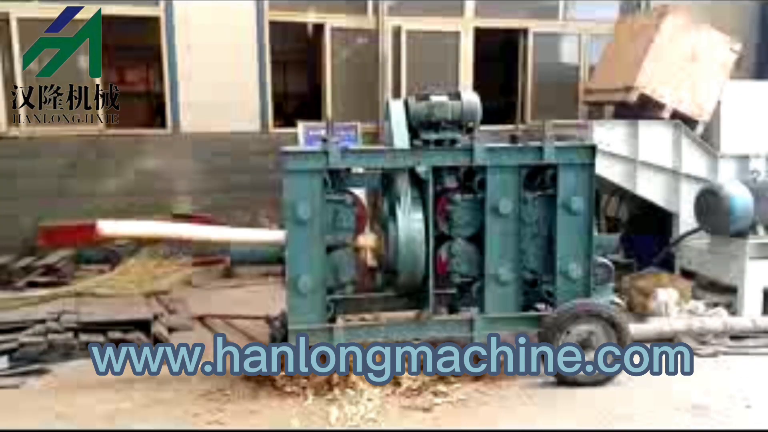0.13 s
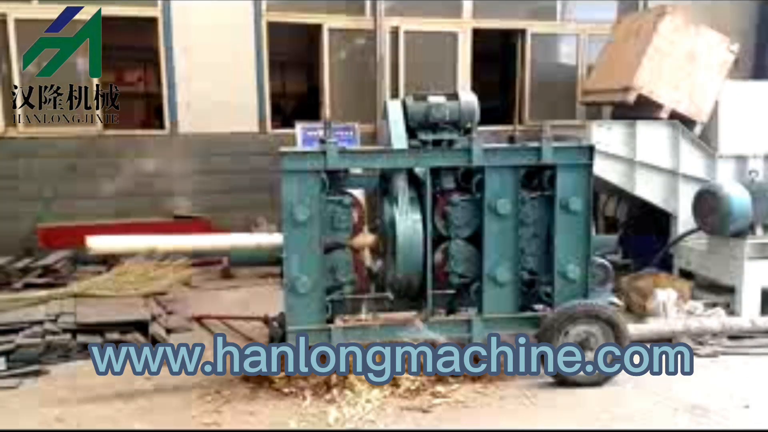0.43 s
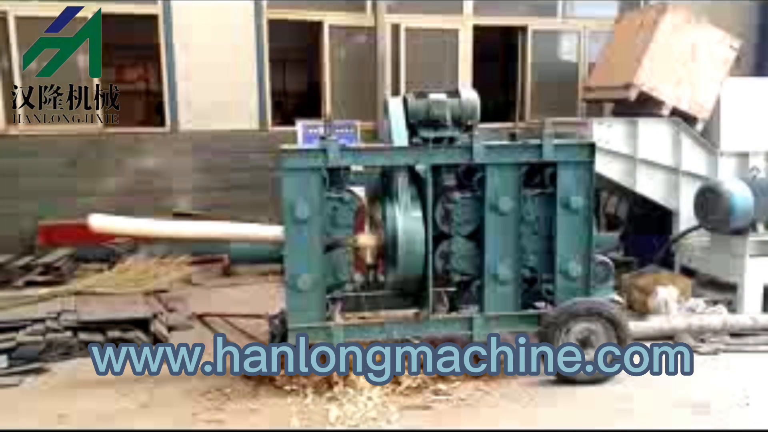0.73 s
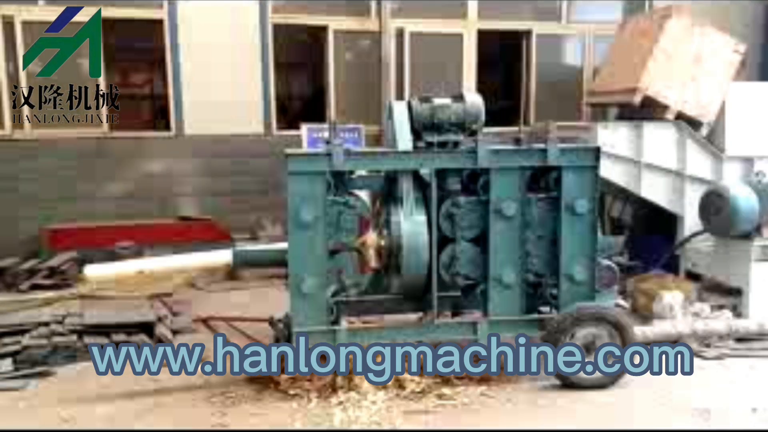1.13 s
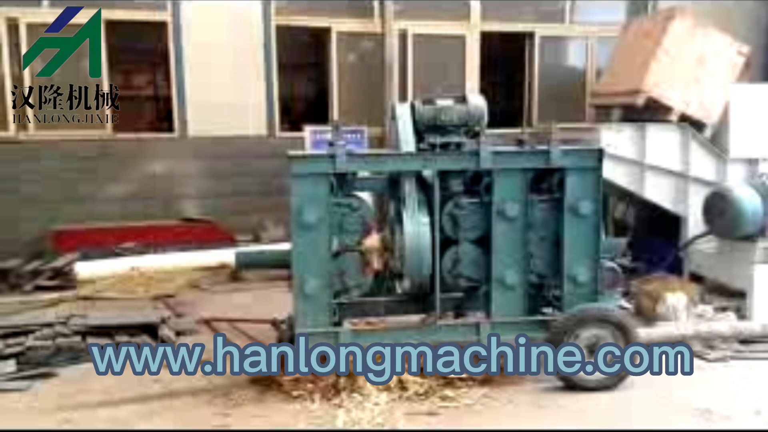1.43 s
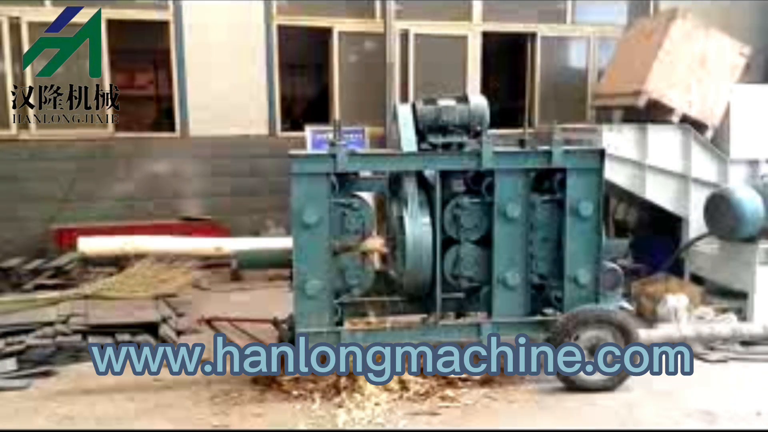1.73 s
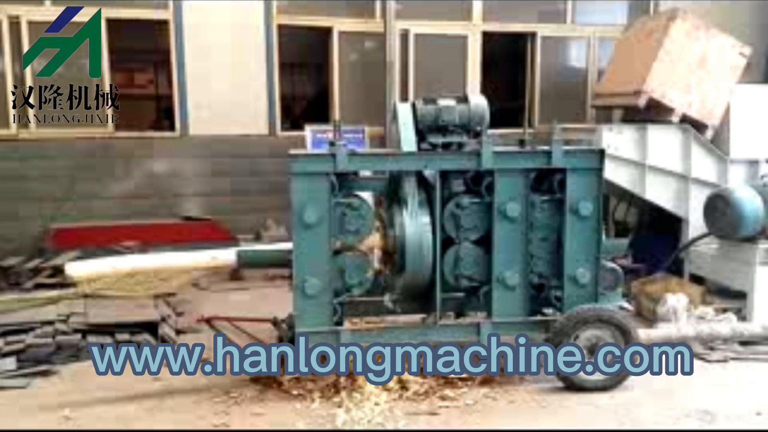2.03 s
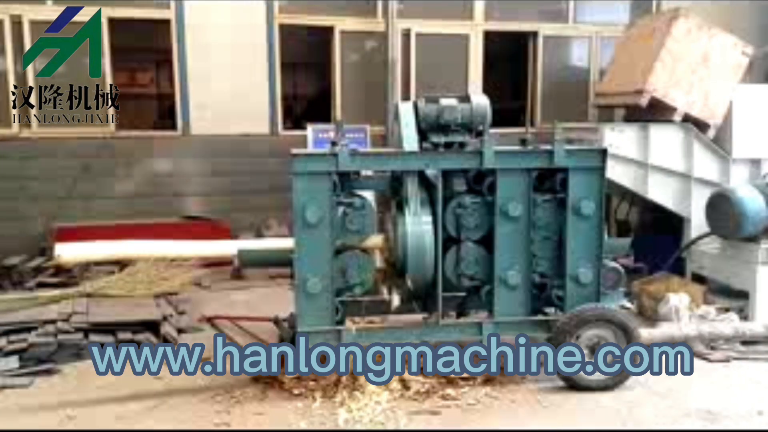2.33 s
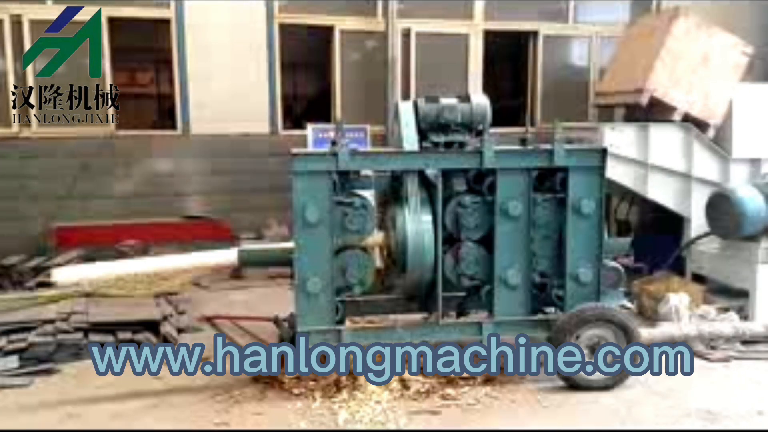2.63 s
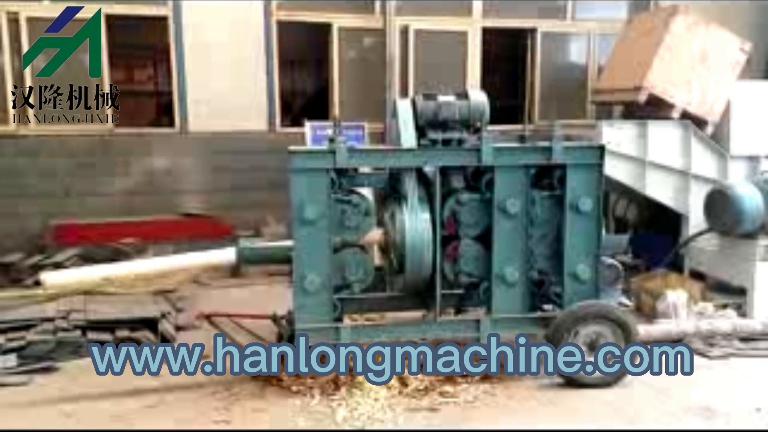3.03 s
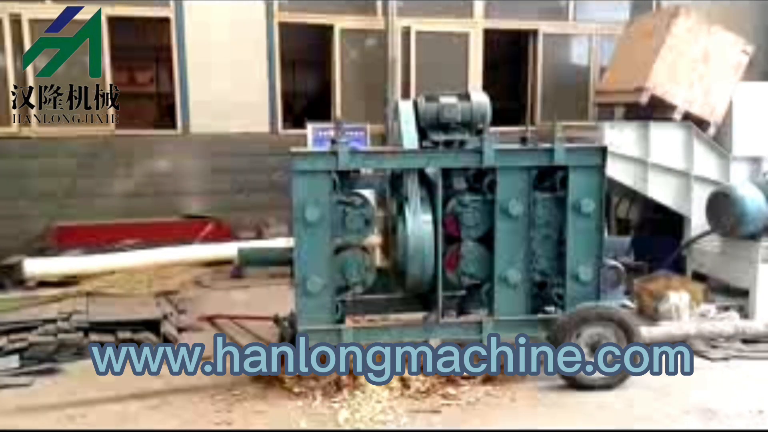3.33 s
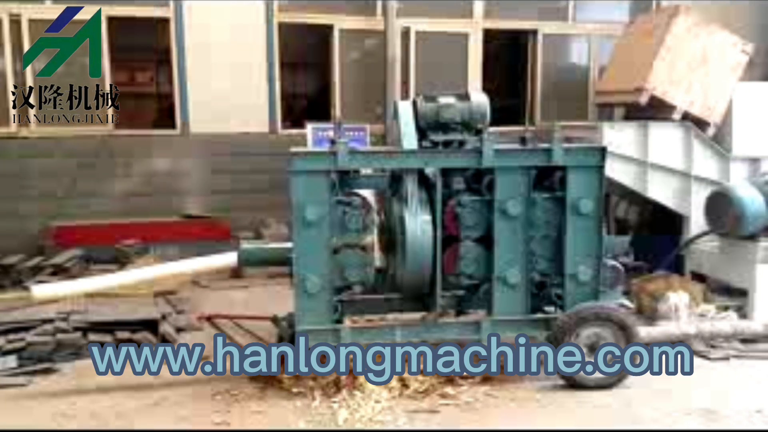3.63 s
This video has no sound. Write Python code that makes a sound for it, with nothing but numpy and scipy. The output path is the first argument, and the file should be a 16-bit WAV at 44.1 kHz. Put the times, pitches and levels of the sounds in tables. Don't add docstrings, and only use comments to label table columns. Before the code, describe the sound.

Loud grinding debarker with whining gears, clattering log knocks and a hard slam near the end.

```python
import sys
import numpy as np
from scipy import signal
from scipy.fft import rfft, irfft, next_fast_len
from scipy.io import wavfile
from scipy.ndimage import uniform_filter1d, map_coordinates

SR = 44100
rng = np.random.default_rng(int(sys.argv[2]) if len(sys.argv) > 2 else 0)


def wav_record(signal):
    frames = np.transpose(np.atleast_2d(signal))
    bounded = np.clip(frames, -1, 1)
    quanta = np.round(bounded * 32767).astype(np.int16)
    wavfile.write(sys.argv[1], SR, quanta)


def undo_db(level):
    steps = np.asarray(level, float) / 20
    return 10 ** steps


N = 167139


def unit(x):
    return x / np.sqrt(np.mean(x ** 2) + 1e-20)


def along(points, hz):
    f, v = np.transpose(points)
    return np.interp(np.log(hz + 1), np.log(f + 1), v)


def curve(rows):
    return np.interp(np.arange(N) / SR, *np.transpose(rows))


def wobble(rate):
    knots = rng.standard_normal(int(N * rate / SR) + 4)
    return map_coordinates(knots, [np.arange(N) * rate / SR])


def filtered(x, response):
    n = x.shape[-1]
    m = next_fast_len(n + 8192)
    return irfft(rfft(x, m) * response(np.fft.rfftfreq(m, 1 / SR)), m)[..., :n]


def peak(f, hz, wide):
    return 1j * f * wide / (hz * hz - f * f + 1j * f * wide + 1e-9)


def spread(pair, spectrum):
    # (frequency [Hz], width [Hz], lift [dB])
    panels = [(117, 13, 3.5), (200, 33, 4.5), (314, 23, -7.5), (548, 70, 3), (769, 26, 5), (888, 6.4, 6.5),
              (1160, 80, 1.5), (1480, 160, 0.5), (2167, 26, 7), (3650, 90, 2.5)]
    # (frequency [Hz], correlation [-1..1])
    likeness = [(30, 0.21), (70, 1), (130, 0.93), (260, 0.91), (550, 0.27), (1140, 0.63), (2380, 0.092),
                (4970, 0.06), (10400, 0.11)]

    def mid_and_side(f):
        lift_db = sum(db * abs(peak(f, hz, wide)) ** 2 for hz, wide, db in panels)
        angle = np.arccos(np.clip(along(likeness, f), -1, 1)) / 2
        return undo_db(along(spectrum, f) + lift_db) * [np.cos(angle), np.sin(angle)]

    mid, side = filtered(pair, mid_and_side)
    return unit(np.array([mid + side, mid - side]))


def patchy(pair, patchy_db):
    z = signal.stft(pair, nperseg=512)[2]
    field = uniform_filter1d(rng.standard_normal(z.shape[1:]), size=7, axis=0)
    field = uniform_filter1d(field, size=9, axis=1)
    return signal.istft(z * undo_db(patchy_db * unit(field)), nperseg=512)[1][:, :N]


def cutting_load():
    # (time [s], level [dB])
    load = [(0, -14.5), (.16, -17.5), (.3, -16), (.47, -16), (.68, -18.5), (.82, -17), (.95, -18.5),
            (1.12, -17), (1.24, -19), (1.5, -17), (2.04, -20), (2.3, -17.5), (2.6, -17.5), (2.78, -19.5),
            (2.92, -18), (3.22, -19.5), (3.32, -16.5), (3.79, -21)]
    return curve(load)


def knife_tearing(load_db):
    # (frequency [Hz], density [dB per Hz])
    tear_spectrum = [(300, -22.5), (520, -1), (1500, 1), (3600, 1), (6000, -4.5), (9000, -6),
                     (11000, -22.5), (11800, -87)]
    chips_per_s, chip_spread_db, chip_share = 5000, 3, .3
    struck = rng.random((2, N)) < chips_per_s / SR
    sizes = undo_db(chip_spread_db * rng.standard_normal((2, N)))
    chips = struck * sizes * rng.choice([-1, 1], size=(2, N))
    friction = rng.standard_normal((2, N))
    stream = np.sqrt(chip_share) * unit(chips) + np.sqrt(1 - chip_share) * friction
    level_db = load_db + 3.5 + .3 * wobble(8.2) + .6 * wobble(29.92)
    tear = undo_db(level_db) * spread(patchy(stream, patchy_db=0.88), tear_spectrum)
    fizz = filtered(tear, lambda f: 1 / (1 + (6500 / (f + 1)) ** 8))
    fizz_flutter_db = 3 * (wobble(18) + .4 * wobble(7))
    return tear + (undo_db(fizz_flutter_db) - 1) * fizz


def frame_rumble(load_db):
    # (frequency [Hz], density [dB per Hz])
    rumble_spectrum = [(25, -73), (60, -11), (100, -1.5), (185, 3), (360, 7), (450, -5), (600, -9),
                       (900, -35.5)]
    swing_db = load_db - load_db.mean()
    level_db = -27 + 0.56 * swing_db + 0.42 * wobble(7.4)
    return undo_db(level_db) * spread(patchy(rng.standard_normal((2, N)), patchy_db=0.5), rumble_spectrum)


def contact(body, t60, crack_db):
    rise_s, crack_t60 = .0007, 0.015
    t = np.arange(SR // 4) / SR
    a, b, c, d = rng.standard_normal((4, len(t)))
    decay = undo_db(-60 * t / max(t60, .01)) * (1 - np.exp(-t / rise_s))
    shake = np.array([a + 0.67 * b, a + 0.29 * c]) * decay
    ring = filtered(shake, body)
    return ring / abs(ring).max() + undo_db(crack_db - 60 * t / crack_t60) * d


def hard_blow():
    # (time [s], peak [dB], t60 [s])
    blows = [
        (3.587, 6, .045),
        (3.602, 3, .06),
        (3.609, 2.5, .06),
        (3.616, 0, .03),
        (3.627, -1, .04),
    ]
    # (frequency [Hz], width [Hz], level [dB])
    modes = [(756, 140, -3.5), (1120, 220, -7.5), (1500, 110, 2), (1700, 66, 0.5), (2130, 510, -2.5),
             (2900, 300, -3), (3360, 320, -15), (4400, 540, -17), (7160, 1200, -25)]

    def roller(f):
        return sum((-1) ** k * undo_db(db) * peak(f, hz, wide) for k, (hz, wide, db) in enumerate(modes))

    out = np.zeros((2, N + SR))
    for s, db, t60 in blows:
        out[:, round(s * SR):][:, :SR // 4] += undo_db(db) * contact(roller, t60, crack_db=-16)
    return out[:, :N]


def log_knocks():
    # (time [s], peak [dB], pitch [Hz], t60 [s], left-right difference [dB])
    bumps = [(0.107, -7.5, 1570, 0.059, 5), (.285, -12.5, 314, 0.2, 1), (0.291, -7, 4870, 0.19, -13),
             (0.401, -9.5, 1270, 0.3, 4), (0.518, -10, 2560, 0.3, -13), (.764, -14, 2420, 0.16, -16),
             (.764, -7.5, 4400, 0.09, 3), (.986, -4.5, 3130, 0.18, -5), (.988, -7.5, 4950, 0.54, -1),
             (.99, -28, 347, 0.12, 0), (.99, -11, 2080, 0.25, 0), (.995, -7.5, 1370, 0.27, 0),
             (1.03, -7, 935, 0.061, -5), (1.012, -11, 2200, .15, 4), (1.02, -16, 3300, .15, 5),
             (1.086, -13, 1500, .1, 1), (1.089, -9.5, 2530, 0.15, -4), (1.105, -17, 4600, .1, 0),
             (1.27, -13, 1150, 0.38, -6), (1.32, -15.5, 290, 0.39, -3), (1.335, -12, 740, .12, -1),
             (1.126, -10, 3130, 0.17, 1), (2.33, -17.5, 200, .4, -1), (1.42, -11, 1100, 0.079, 0),
             (2.066, -12, 4550, .15, 2), (2.068, -17, 2000, .1, -12), (2.071, -13.5, 770, 0.39, -4),
             (2.108, -14, 1170, 0.15, 4), (2.28, -10, 4600, 0.093, 7), (2.382, -10, 4470, 0.091, 5),
             (2.292, -5, 2880, 0.062, 3), (2.344, -8, 3280, 0.043, 1), (2.368, -12, 1580, 0.13, 4),
             (2.484, -13, 2150, .08, 10), (2.484, -7, 2920, 0.08, 0), (2.956, -14.5, 1700, 0.97, -4),
             (3.29, -18, 1290, 0.4, 2), (3.49, -22.5, 656, 0.3, 21)]
    out = np.zeros((2, N + SR))
    for s, db, hz, t60, pan_db in bumps:
        knock = contact(lambda f: peak(f, hz, .4 * hz) ** 2, t60, crack_db=-40)
        gain = undo_db(db + np.array([[pan_db], [-pan_db]]) / 2)
        out[:, round(s * SR):][:, :SR // 4] += gain * knock
    return out[:, :N]


def tone(hz, db, lead, drift):
    sway_db = 4
    phase = 2 * np.pi * np.cumsum(hz * (1 + drift * wobble(24.88))) / SR
    level = np.sqrt(2) * undo_db(db + sway_db * wobble(8.6))
    return level * np.sin(phase + np.array([[lead], [-lead]]) / 2)


def gear_whines():
    # (frequency [Hz], level [dB rms], left lead [rad])
    gear_tones = [(182, -41, 0), (317, -39, .8), (569, -43, 0), (922, -41, 0), (1219, -44, 2.5),
                  (2157, -45, 1), (3389, -42, 1)]
    return sum(tone(hz, db, lead, drift=.004) for hz, db, lead in gear_tones)


def knife_ring_whines():
    # (time [s], frequency [Hz], level [dB])
    ring_tracks = [
        [(0, 3528, -36), (.5, 3528, -32), (1.1, 3530, -33), (1.25, 3530, -50)],
        [(.5, 3560, -50), (.7, 3575, -34), (1, 3600, -33), (1.4, 3625, -34), (1.85, 3630, -32),
         (2.05, 3645, -33), (2.45, 3650, -38), (3.79, 3600, -46)],
        [(2.1, 3270, -55), (2.2, 3275, -35), (2.3, 3285, -32), (2.42, 3270, -36), (2.5, 3270, -55)],
    ]
    out = np.zeros((2, N))
    for track in ring_tracks:
        s, hz, db = np.transpose(track)
        out += tone(curve(np.c_[s, hz]), curve(np.c_[s, db]), lead=1, drift=.003)
    return out


def bearing_squeal():
    # (time [s], level [dB])
    squeal_level = [
        (0, -20),
        (.1, -22),
        (.15, -17),
        (.19, -21),
        (.23, -45),
        (.3, -30),
        (.35, -90),
    ]
    centre_hz, wide_hz = 10840, 140
    band = filtered(rng.standard_normal((2, N)), lambda f: peak(f, centre_hz, wide_hz) ** 2)
    return undo_db(curve(squeal_level)) * unit(band)


def yard_echo(hits):
    echo_db, echo_t60, first_wall_s = -8, 0.31, .008
    t = np.arange(SR // 2) / SR
    tail = rng.standard_normal((2, len(t))) * undo_db(-60 * t / echo_t60) * (t > first_wall_s)
    tail = unit(tail) / np.sqrt(len(t))
    return undo_db(echo_db) * signal.fftconvolve(hits, tail, axes=1)[:, :N]


def scene():
    load_db = cutting_load()
    machine = knife_tearing(load_db) + frame_rumble(load_db)
    hits = hard_blow() + log_knocks()
    tones = gear_whines() + knife_ring_whines() + bearing_squeal()
    return machine + hits + tones + yard_echo(hits)


def roll_off(x):
    return signal.sosfilt(signal.butter(12, 15000, fs=SR, output="sos"), x)


def record(dry):
    # (frequency [Hz], gain [dB])
    left_port = [(2000, 0.5), (2500, -3.5), (3100, -2.5), (3900, -1.5), (4550, 6.5), (5200, 0.5),
                 (7000, -11.5), (10000, -20.5)]
    # (frequency [Hz], gain [dB])
    right_port = [(1900, 1), (2250, 3), (3400, 2), (4000, -5.5), (5000, -10), (6800, -10.5), (7200, -14.5),
                  (10000, -30)]
    lag_s = .00004
    clip_top, clip_hard = .95, 10

    def ports(f):
        lag = np.exp(np.outer([-1j, 1j], np.pi * f * lag_s))
        return undo_db([along(left_port, f), along(right_port, f)]) * lag

    x = filtered(dry, ports)
    mix = x / (1 + abs(x / clip_top) ** clip_hard) ** (1 / clip_hard)
    return roll_off(mix)


dry = scene()
out = record(dry)
wav_record(out)
```